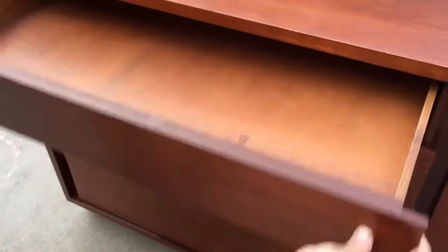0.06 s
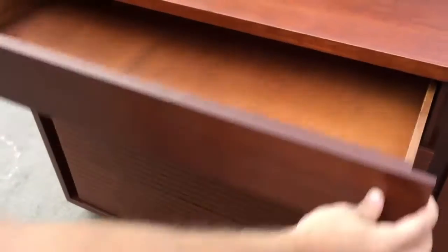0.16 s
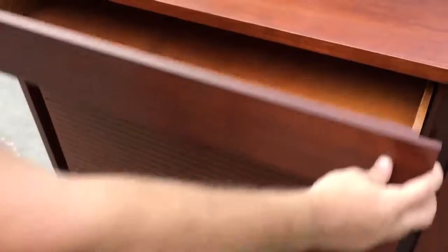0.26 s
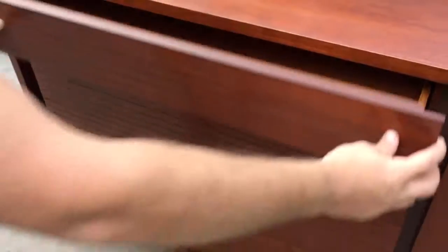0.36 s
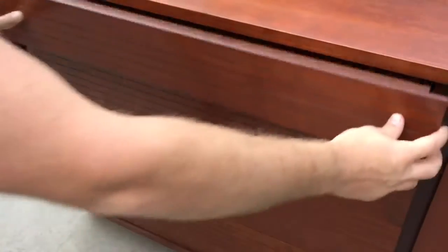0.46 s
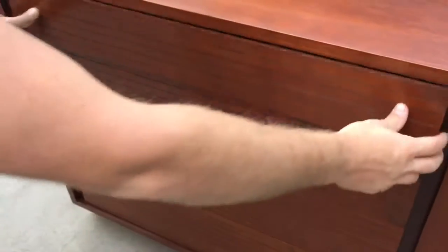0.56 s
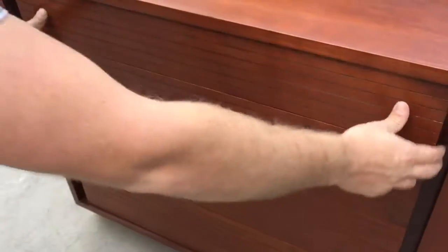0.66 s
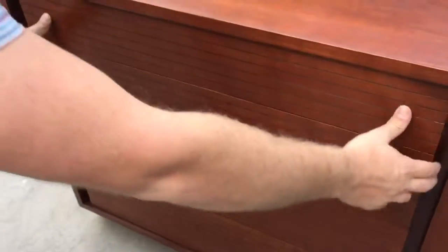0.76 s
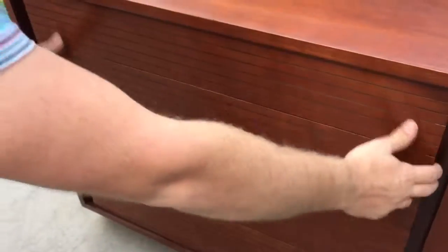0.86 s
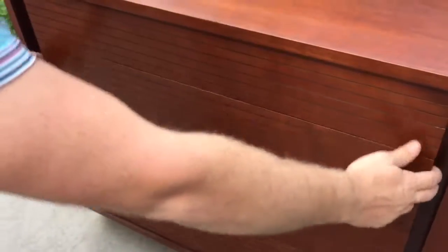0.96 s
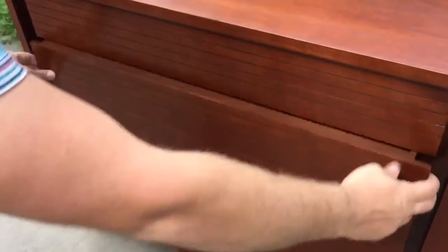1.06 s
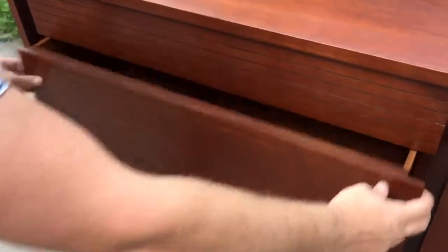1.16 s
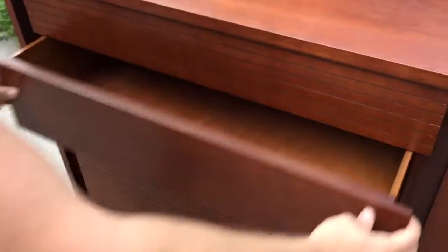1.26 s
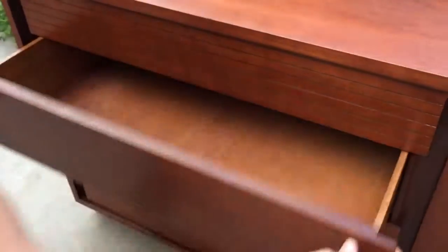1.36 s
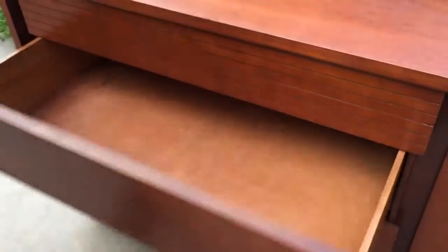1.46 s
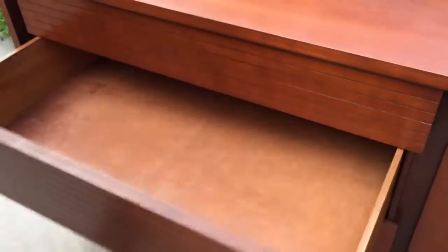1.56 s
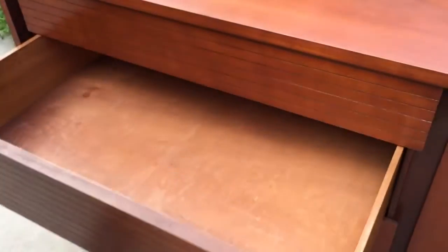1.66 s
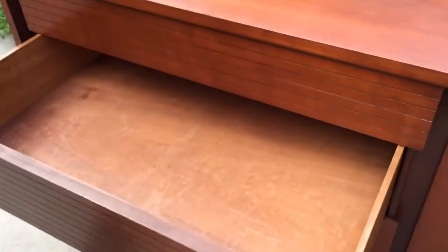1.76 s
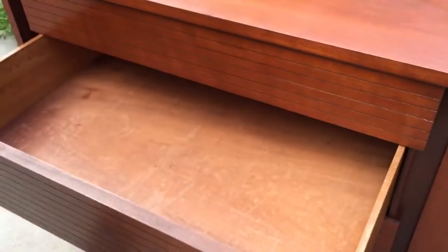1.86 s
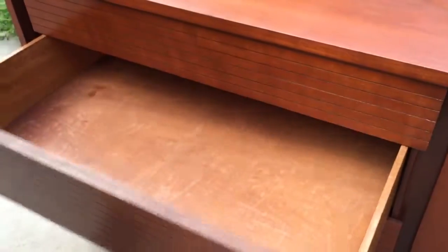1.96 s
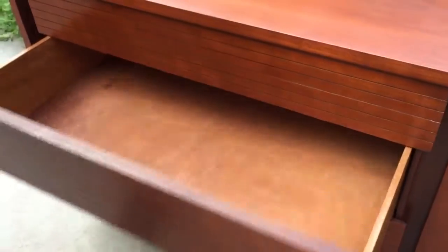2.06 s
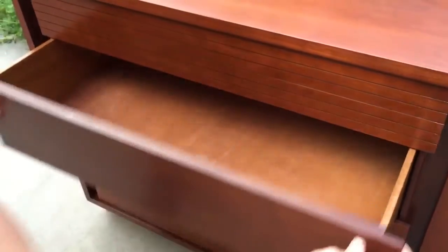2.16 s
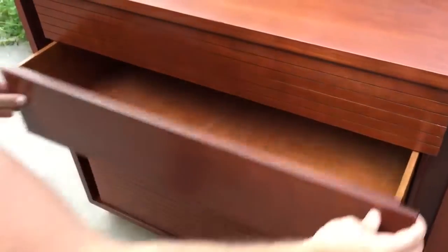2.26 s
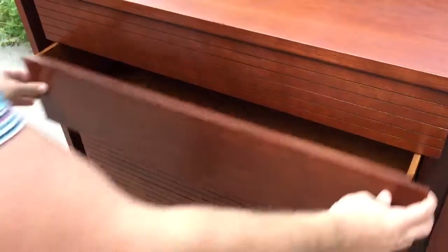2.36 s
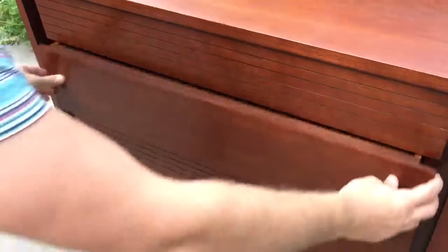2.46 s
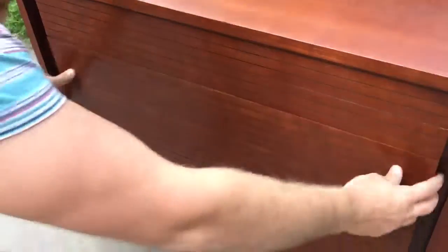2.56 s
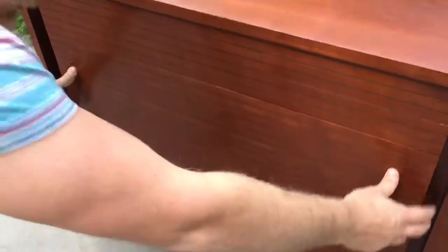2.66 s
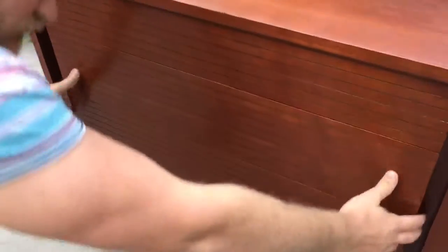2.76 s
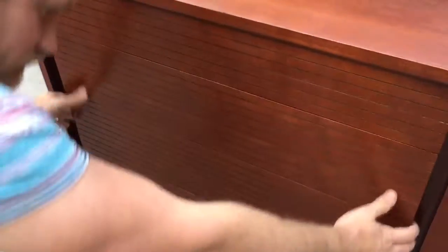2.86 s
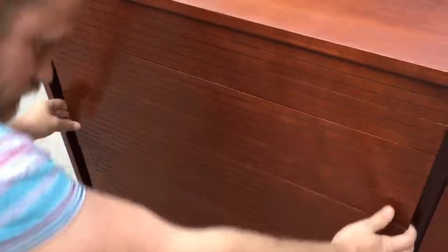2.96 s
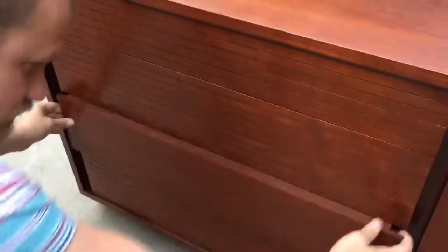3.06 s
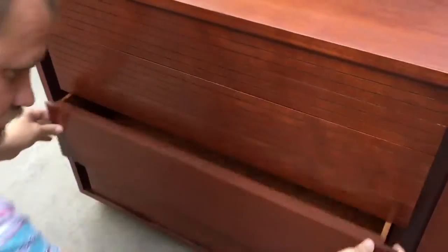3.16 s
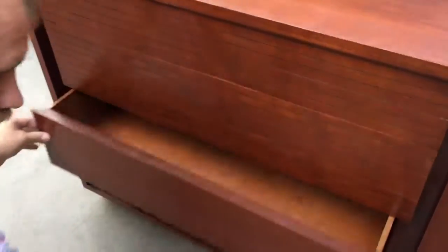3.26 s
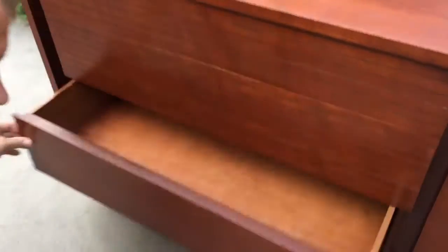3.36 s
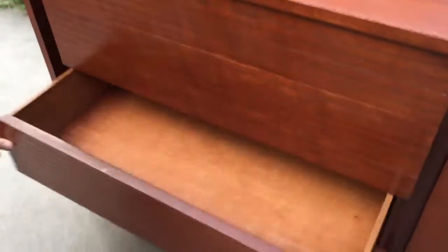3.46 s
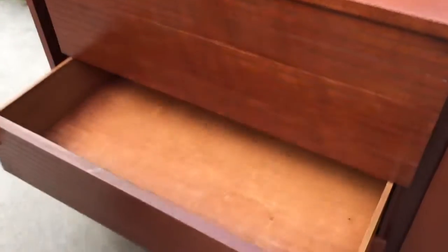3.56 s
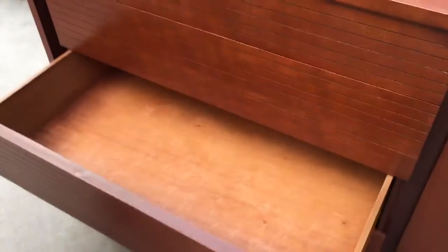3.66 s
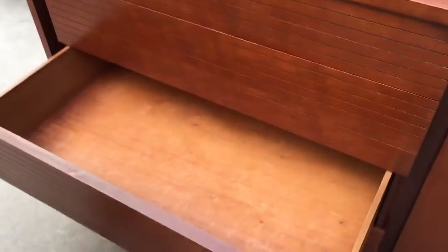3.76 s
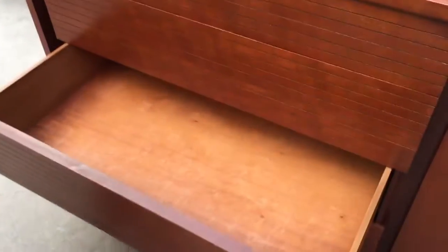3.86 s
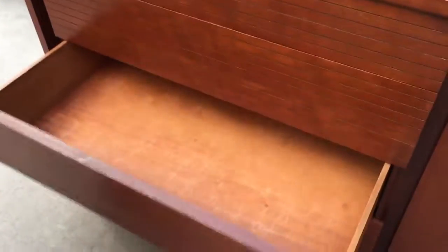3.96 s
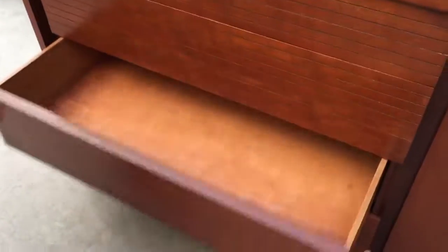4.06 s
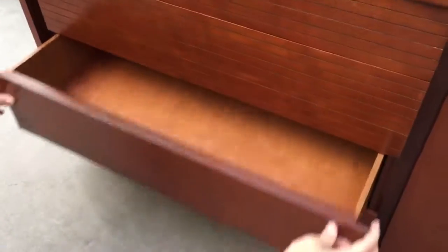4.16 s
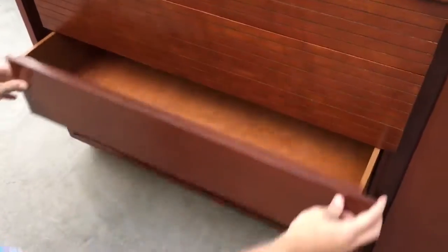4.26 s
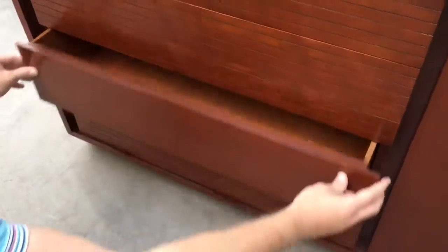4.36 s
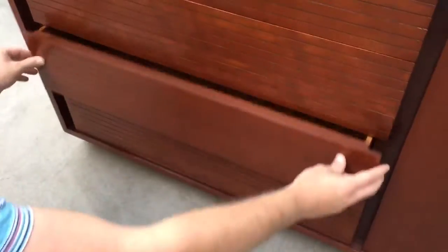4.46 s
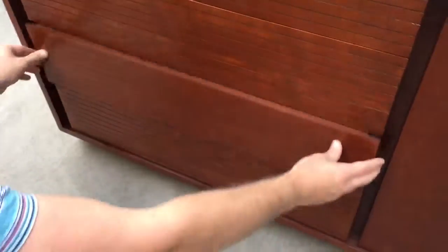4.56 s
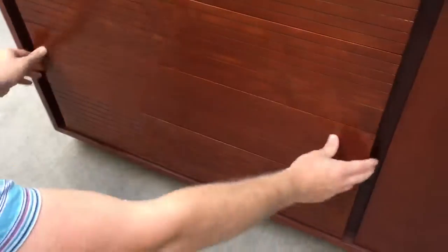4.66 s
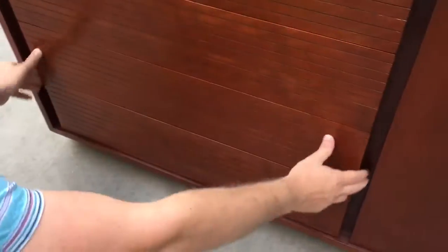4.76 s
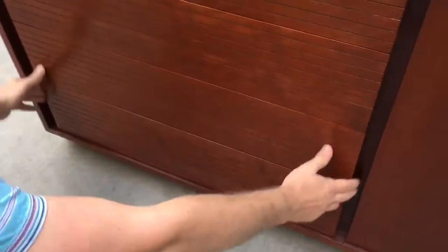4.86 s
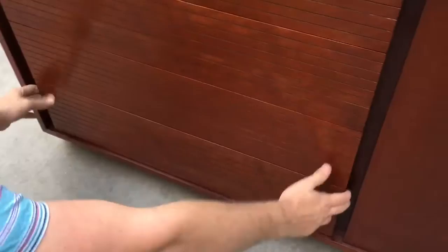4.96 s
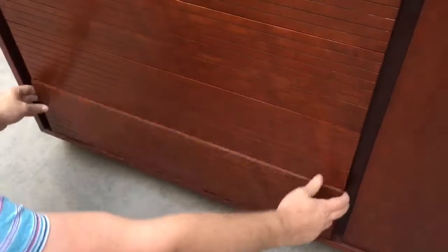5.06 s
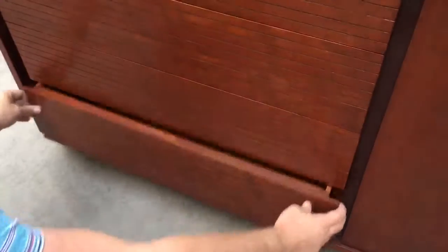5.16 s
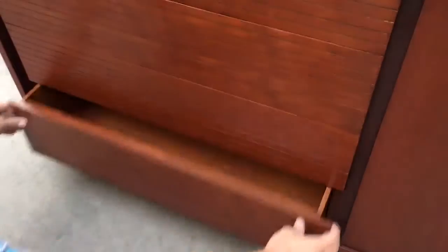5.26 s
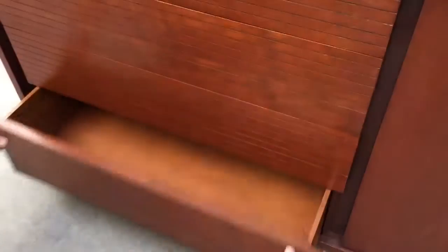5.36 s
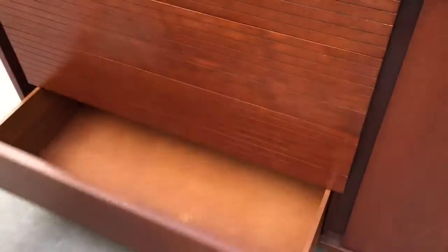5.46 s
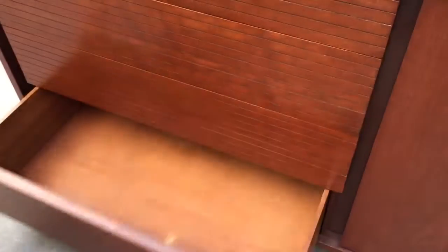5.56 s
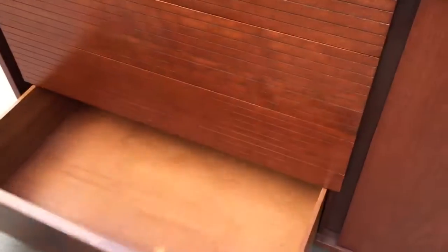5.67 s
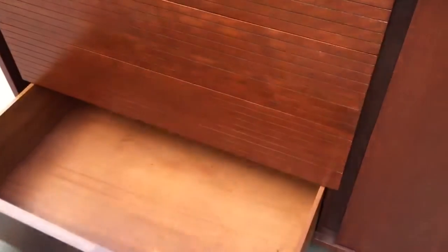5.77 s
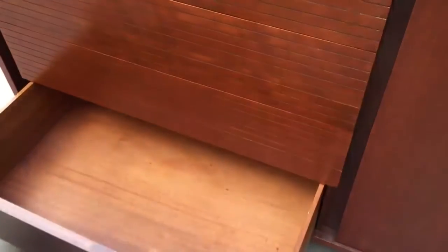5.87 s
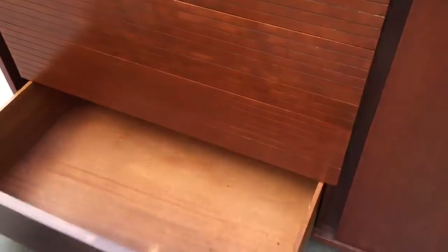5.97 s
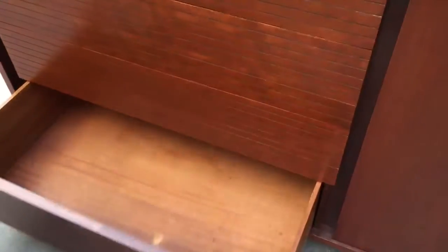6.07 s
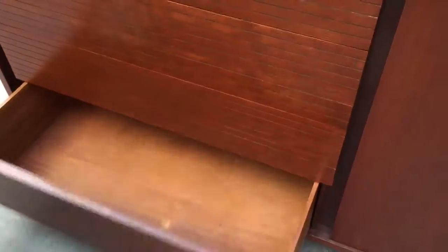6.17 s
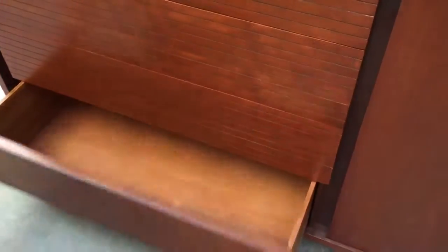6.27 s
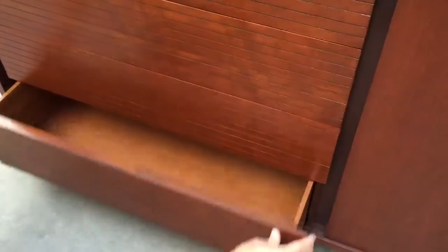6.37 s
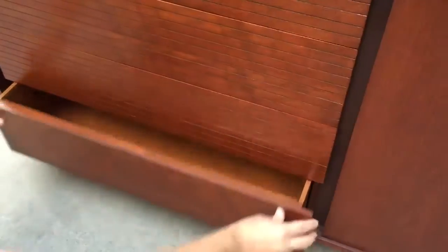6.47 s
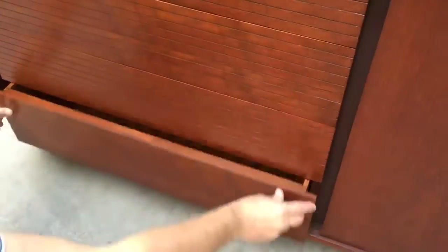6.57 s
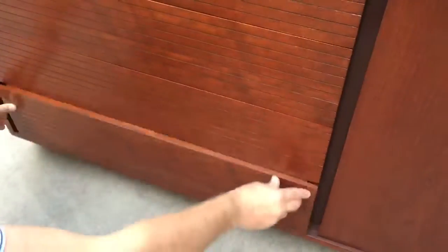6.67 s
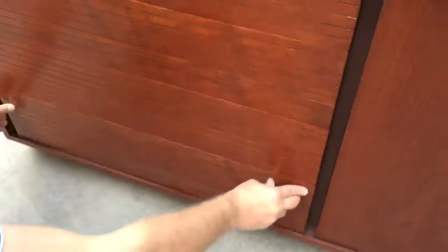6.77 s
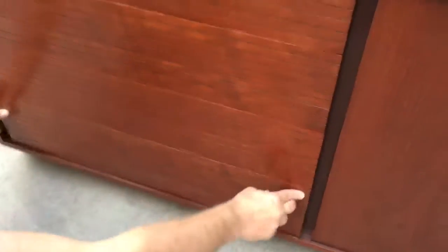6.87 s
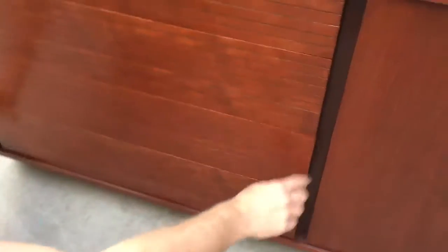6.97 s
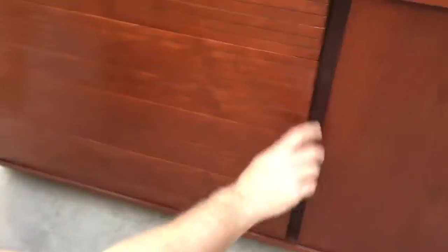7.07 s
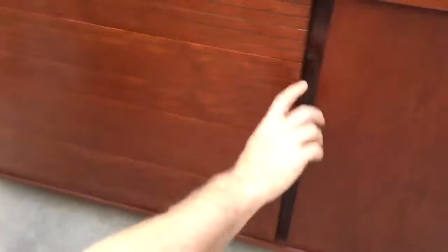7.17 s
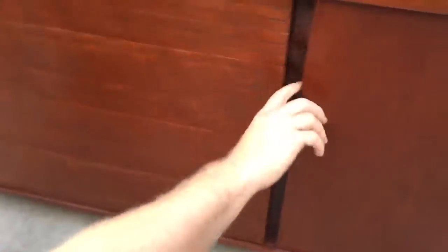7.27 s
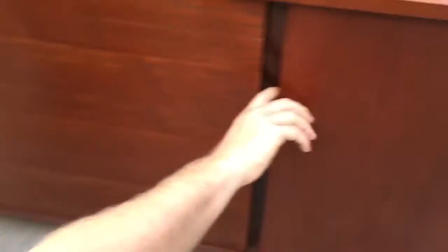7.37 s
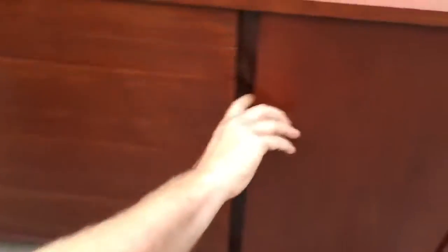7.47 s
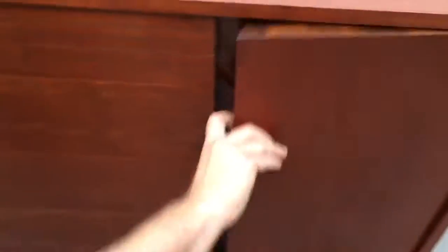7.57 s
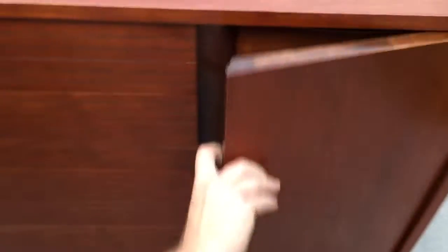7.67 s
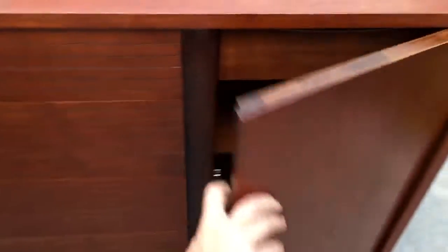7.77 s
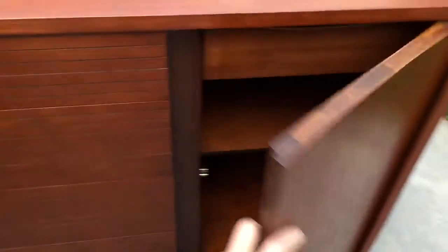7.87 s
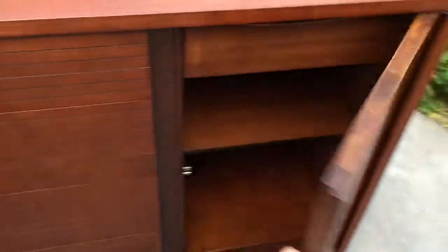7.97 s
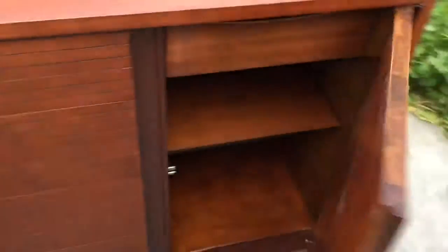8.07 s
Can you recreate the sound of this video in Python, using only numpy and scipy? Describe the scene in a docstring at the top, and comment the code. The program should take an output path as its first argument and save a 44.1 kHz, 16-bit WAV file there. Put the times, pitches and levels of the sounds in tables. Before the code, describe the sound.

Close and dry, four empty wooden drawers are worked one after another: grainy sliding swells and eases, small thuds catch on the runners, and each closing cracks sharply with a short boxy boom. Fingers brush and tap the wood between moves. A door then swings almost silently, humming deep, as low road noise slowly grows behind.

```python
"""Wood hisses and rumbles on runners over murmuring traffic, then a drawer shuts with a hollow knock.
Three more drawers of this outdoor sideboard are pulled out and pushed shut in turn; then its door hums open.
Friction is random slips, coloured by runner and panels or ringing the box modes, and follows the hand's speed.
Knocks, bumps and taps are bursts of decaying wood modes; traffic is coloured noise with band-passed drones."""
import sys
import numpy as np
from scipy import signal
from scipy.fft import rfft, irfft, next_fast_len
from scipy.io import wavfile

SR = 44100
rng = np.random.default_rng(int(sys.argv[2]) if len(sys.argv) > 2 else 0)


def transcribe(signal):
    """Save signal, clipped to [-1, 1], as a 16-bit WAV file at the path in sys.argv[1]."""
    frames = np.atleast_2d(signal).T
    limited = np.clip(frames, -1, 1)
    pcm = np.round(limited * 32767).astype(np.int16)
    wavfile.write(sys.argv[1], SR, pcm)


N = 358091
TIME = np.arange(N) / SR
RING = TIME[:SR // 2]  # time axis of one ringing sound


def from_db(db):
    """Decibels to gain."""
    return 10 ** (np.asarray(db) / 20)


def rms_one(x):
    """Scale to unit rms."""
    return x / np.sqrt(np.mean(x ** 2) + 1e-20)


def at_hz(points, hz):
    """Read a table on a log-frequency axis."""
    point_hz, value = np.transpose(points)
    return np.interp(np.log(hz + 1), np.log(point_hz), value)


def colour(x, spectrum):
    """Give a steady sound a spectrum; rms 1."""
    size = next_fast_len(N)
    gain = from_db(at_hz(spectrum, np.fft.rfftfreq(size, 1 / SR)))
    return rms_one(irfft(rfft(x, size) * gain, size)[:N])


def drift(rate_hz):
    """Random values joined by straight lines, rate_hz of them a second; spread about 1."""
    return np.interp(TIME * rate_hz, np.arange(4000), rng.standard_normal(4000))


def add(track, s, sound):
    """Mix a sound into the track at a time."""
    at = round(s * SR)
    track[at:at + len(sound)] += sound[:N - at]


def ring(modes):
    """Free ringing of struck modes: decaying sines."""
    out = np.zeros(len(RING))
    for pitch_hz, level_db, t60_s in modes:
        out += from_db(level_db - 60 * RING / t60_s) * np.sin(2 * np.pi * pitch_hz * RING)
    return out


# decay of the weaker panel modes: pitch_hz [Hz], t60_s [s]
WOOD_T60 = [(150, 0.26), (500, 0.24), (1200, 0.14), (2500, 0.12), (5000, 0.13), (12000, 0.08)]


def crowd(spectrum, tilt_db_per_oct=0, edge_hz=20000, uneven_db=2.5):
    """Many overlapping modes of uneven strength, each octave dying at its own rate; starts at rms 1."""
    hz = np.fft.rfftfreq(len(RING), 1 / SR)
    tilt_db = tilt_db_per_oct * np.log2(hz / 1000 + 1 / 10)
    level_db = at_hz(spectrum, hz) + tilt_db + uneven_db * peaks_db(hz, 35)
    phases = np.exp(2j * np.pi * rng.random(len(hz)))
    modes = from_db(level_db) / np.sqrt(1 + (hz / edge_hz) ** 8) * phases * (hz > 40)
    modes /= np.std(irfft(modes))
    octave = np.round(np.log2(hz + 1))
    out = np.zeros(len(RING))
    for k in range(5, 15):
        decay = from_db(-60 * RING / at_hz(WOOD_T60, 2. ** k))
        out += irfft(modes * (octave == k)) * decay
    return out


def soften(x, contact_s):
    """The force of a contact takes a moment to build."""
    return x * (1 - np.exp(-RING / contact_s))


def friction(per_s, spread_db):
    """Wood fibres catch and let go: random slips of uneven size."""
    size_db = spread_db * np.minimum(rng.exponential(1, N), 4)
    slips = from_db(size_db) * rng.choice([-1, 1], N)
    return slips * (rng.random(N) < per_s / SR)


def peaks_db(hz, spacing_hz):
    """Capped peaks and deeper valleys of a wooden panel's response; spread about 1."""
    heights = np.minimum(rng.standard_normal(1500), 1)
    return np.interp(hz / spacing_hz, np.arange(len(heights)), heights)


def through_wood(x, tilt_db_per_oct, ripple_db=8.0, spacing_hz=75):
    """Friction is radiated by panels that favour some pitches over others."""
    hz = np.fft.rfftfreq(len(x), 1 / SR)
    tilt_db = tilt_db_per_oct * np.log2(hz / 6000 + 1 / 10)
    return irfft(rfft(x) * from_db(ripple_db * peaks_db(hz, spacing_hz) + tilt_db), len(x))


def speed(start_s, rise_s, fall_s):
    """A hand's movement gathers speed, then eases to a stop; 0 to 1."""
    corners_s = [start_s, start_s + rise_s, start_s + rise_s + fall_s]
    return np.maximum(np.sin(np.pi * np.interp(TIME, corners_s, [0, .5, 1])), 0)


def touch(start_s, length_s):
    """Pressure of a brief rubbing contact; 0 to 1."""
    return np.sqrt(speed(start_s, length_s / 2, length_s / 2))


# spectrum of the air and microphone hiss: pitch_hz [Hz], density_db [dB per Hz]
AIR_SPECTRUM = [(1000, 8.5), (4000, 3.5), (9000, -5.5), (10500, -8.5), (12000, -5.5), (15500, -10.5)]


def air(level_db=-73):
    """Steady faint hiss of the air and the microphone: coloured noise."""
    return from_db(level_db) * colour(rng.standard_normal(N), AIR_SPECTRUM)


# tyre noise level: time_s [s], level_db [dB]
TYRE_LEVELS = [(0, -56), (1.1, -55), (1.95, -57.5), (2.6, -55.5), (4.7, -55), (8.1, -49.5)]
# tyre noise spectrum: pitch_hz [Hz], density_db [dB per Hz]
TYRE_SPECTRUM = [(25, -29), (42, -15.5), (62, 15), (80, -1.5), (115, 8.5), (150, -3), (200, -4), (300, -15),
                 (400, -11.5), (650, -4.5), (1000, -3.5), (1700, -11), (3000, -26.5), (5000, -41),
                 (9000, -41), (15000, -59)]
# engine levels: time_s [s], low_drone_db [dB], upper_drone_db [dB]
ENGINE_LEVELS = [(0, -58, -89), (1, -58.5, -66), (2, -63.5, -75), (3.1, -65, -70), (4.6, -52.5, -68.5),
                 (5.15, -57, -70.5), (6, -76.5, -63), (7.1, -60, -60.5), (8.1, -59, -59)]
# engine drone bands: pitch_hz [Hz], width_hz [Hz]
DRONE_BANDS = [(107, 16), (265, 72)]


def traffic():
    """Far tyres slowly swell as coloured noise; engines drone beneath as narrow bands of noise."""
    out = from_db(np.interp(TIME, *np.transpose(TYRE_LEVELS))) * colour(rng.standard_normal(N), TYRE_SPECTRUM)
    time_s, *drone_levels_db = np.transpose(ENGINE_LEVELS)
    for level_db, (pitch_hz, width_hz) in zip(drone_levels_db, DRONE_BANDS):
        edges_hz = [pitch_hz - width_hz / 2, pitch_hz + width_hz / 2]
        band = signal.butter(2, edges_hz, "band", fs=SR, output="sos")
        # the first second lets the filter settle
        drone = rms_one(signal.sosfilt(band, rng.standard_normal(N + SR))[SR:])
        out += from_db(np.interp(TIME, time_s, level_db)) * drone
    return out


# swing of the door: start_s [s], rise_s [s], fall_s [s]
DOOR_SWING = (7.59, .29, .34)


def door(pitch_hz=64, full_speed_db=-42.5, speed_power=1.1):
    """Hinge friction keeps the door's lowest mode swinging, the more so the faster it turns."""
    phase = 2 * np.pi * np.cumsum(pitch_hz * (1 + 0.0055 * drift(5.8))) / SR
    return from_db(full_speed_db) * speed(*DOOR_SWING) ** speed_power * np.sqrt(2) * np.sin(phase)


# fingers or a drawer's edge brush the wood: start_s [s], end_s [s], level_db [dB, before the panels]
BRUSHES = [(0.857, 1.033, -74.5), (2.839, 2.998, -68), (4.165, 4.219, -61.5), (4.912, 5.058, -68.5),
           (5.7, 5.766, -64.5), (6.1, 6.236, -68.5), (7.25, 7.355, -81), (7.454, 7.66, -81),
           (8.06, 8.22, -64)]
# brushing spectrum: pitch_hz [Hz], density_db [dB per Hz]
BRUSH_SPECTRUM = [(2000, 2), (4000, 2.5), (6500, 1), (8700, 2.5), (10400, -4.5), (12000, -2),
                  (15500, -11.5)]


def brushing():
    """Light touches slide over the finish with a thin hiss that swells and fades."""
    pressure = sum(from_db(level_db) * touch(start_s, end_s - start_s) for start_s, end_s, level_db in BRUSHES)
    hiss = through_wood(colour(rng.standard_normal(N), BRUSH_SPECTRUM), 0)
    return pressure * hiss * from_db(1.6 * drift(90))


# a drawer tips or catches on its runners:
# time_s [s], level_db [dB], upper_edge_hz [Hz], tilt_db_per_oct [dB per octave]
BUMPS = [(1.208, -37, 260, -4.5), (2.031, -32, 850, -1.5), (2.169, -32.5, 298, -5), (2.186, -38, 129, -14),
         (2.209, -31.5, 636, 0), (2.318, -43, 405, 6), (3.94, -41.5, 490, -2.5), (4.051, -37.5, 320, -6),
         (4.158, -35.5, 416, -3), (4.273, -42, 433, 2), (4.306, -34.5, 110, -6), (5.296, -39, 215, 0),
         (5.633, -49.5, 250, 11), (5.711, -46.5, 880, 8), (6.106, -38, 428, 5.5), (6.201, -36.5, 520, 4.5),
         (6.221, -39, 298, 7), (6.292, -40, 496, 1), (6.754, -41, 213, 2)]
# bump spectrum: pitch_hz [Hz], density_db [dB per Hz]
BUMP_SPECTRUM = [(50, -12), (90, 10), (170, 2.5), (300, 6.5), (420, -5.5), (560, -1.5), (900, -6.5),
                 (2000, 9)]


def bumps(contact_s=0.0033):
    """A drawer bumps on its runners: dull modes under a soft contact."""
    out = np.zeros(N)
    for time_s, level_db, upper_edge_hz, tilt_db_per_oct in BUMPS:
        thud = crowd(BUMP_SPECTRUM, tilt_db_per_oct, upper_edge_hz)
        add(out, time_s, from_db(level_db) * soften(thud, contact_s))
    return out


# fingers tap the wood: time_s [s], level_db [dB], tilt_db_per_oct [dB per octave]
TAPS = [(1.053, -45, -5), (2.851, -59, 22), (3.945, -47.5, -0.5), (5.71, -54.5, -8.5), (7.049, -61.5, 7),
        (7.203, -65, 9), (7.265, -53, -6), (7.571, -61, -4), (7.605, -61.5, 5)]
# modes of a drawer front under a finger: pitch_hz [Hz], level_db [dB], t60_s [s]
FRONT_MODES = [(717, -10, 0.066), (887, -6, 0.31), (1260, -6, .08), (1810, -13, 0.11)]
# the crowd of weaker panel modes, also in slams(): pitch_hz [Hz], density_db [dB per Hz]
WOOD_SPECTRUM = [(100, -11), (250, -4), (400, -6), (800, -3), (1300, -5.5), (1900, 1), (2500, -8),
                 (3100, -6), (3800, -12), (5000, -16.5), (8000, -24.5), (9300, -24.5), (10500, -37),
                 (12000, -35), (15000, -44)]


def taps(damping_s=0.027, front_at_zero_tilt_db=-6, contact_s=0.00054):
    """Light taps that the fingers damp at once; the duller ones ring the drawer front more."""
    out = np.zeros(N)
    for time_s, level_db, tilt_db_per_oct in TAPS:
        tick = crowd(WOOD_SPECTRUM, tilt_db_per_oct) * np.exp(-RING / damping_s)
        front = from_db(front_at_zero_tilt_db - tilt_db_per_oct) * ring(FRONT_MODES)
        add(out, time_s, from_db(level_db) * soften(tick + front, contact_s))
    return out


# a drawer binds: start_s [s], length_s [s], level_db [dB]
GROANS = [(0.39, 0.12, -53.5), (1.375, 0.11, -51.5), (1.514, .08, -50.5), (2.03, .05, -48),
          (2.14, .12, -48.5), (2.345, 0.058, -47.5), (2.407, 0.052, -50.5), (5.42, .12, -61),
          (6.2, .2, -59)]
# modes of a drawer's bottom: pitch_hz [Hz], level_db [dB], t60_s [s]
GROAN_MODES = [(274.4, 1, 0.096), (401, -8, .1), (528.3, 7.5, 0.068), (593, -10, 0.15), (685, -9, 0.055),
               (960, -12, 0.26)]


def groaning():
    """Where a drawer binds, coarse slips ring its bottom."""
    slips = friction(per_s=1600, spread_db=0.5)
    groan = rms_one(signal.fftconvolve(slips, ring(GROAN_MODES))[:N])
    return groan * sum(from_db(level_db) * touch(start_s, length_s) for start_s, length_s, level_db in GROANS)


# modes of each drawer box: pitch_hz [Hz], level_db [dB], t60_s [s]
TOP_BOX = [(57.8, -12.5, 0.4), (86, -28, 0.2), (129, -21, 0.41), (197.6, -4, 0.23), (215.7, -3, 0.14),
           (263, -10, 0.36), (334, -24, 0.082), (549, -1.5, 0.13), (592, -2.5, 0.062), (660, -10, 0.075),
           (863, -15, 0.14)]
SECOND_BOX = [(55.8, -29, 0.91), (98, -4.5, 0.32), (134, -4, 0.11), (157.2, 4.5, 0.25), (180, -11, 0.22),
              (224.6, -9.5, 0.29), (327, -12, 0.25), (355.5, -12, 0.147), (520, -36, 0.096),
              (830, -11, 0.12)]
THIRD_BOX = [(54.6, -10, 0.34), (110, -3, 0.21), (134.3, 15, 0.063), (161.8, 0.5, 0.23), (188.6, -13, 0.39),
             (225, -2, 0.23), (320, 3.5, 0.1), (376, -9, 0.16), (590, -24, 0.13), (805, -65, 0.043)]
BOTTOM_BOX = [(77.4, -16, 0.46), (106, -23, 0.21), (123, 3, 0.25), (158.7, 0, 0.26), (176, 3, 0.2),
              (273, -19, 0.16), (356, -1.5, 0.097), (449, -4.5, 0.075), (613, -5, 0.049),
              (844, -10.5, 0.14)]
BOXES = [TOP_BOX, SECOND_BOX, THIRD_BOX, BOTTOM_BOX]
# when the hand moves on to the next drawer: time_s [s]
NEXT_DRAWER_S = [1.0, 3.0, 5.1]


def box_at(s):
    """Modes of the drawer that is in hand at a time."""
    return BOXES[np.searchsorted(NEXT_DRAWER_S, s)]


# a hand pushes or pulls a drawer: start_s [s], rise_s [s], fall_s [s]; at full speed, before panels and load:
# hiss_db [dB], tilt_db_per_oct [dB per octave], fine_db [dB], rumble_db [dB], boom_db [dB], floor_db [dB]
STROKES = [(0.01, 0.17, 0.44, -58, 1.5, -69, -51.5, -63, -46),
           (1.09, 0.37, 0.37, -60.5, -1.5, -64, -55, -69, -53.5),
           (1.98, 0.21, 0.54, -59, 0, -66, -55, -68, -50), (3.13, 0.36, 0.39, -61, -2, -61, -53, -57, -66),
           (3.93, .33, 0.38, -61.5, -1, -66.5, -55.5, -57.5, -58),
           (5.18, 0.24, 0.57, -63.5, -4.5, -66, -47.5, -50.5, -50.5),
           (6.03, 0.37, 0.39, -62.5, -4.5, -64, -49.5, -49.5, -62)]
# spectra of hiss, fine hiss and rumble on the runners: pitch_hz [Hz], density_db [dB per Hz]
HISS_SPECTRUM = [(900, 8), (1500, 10.5), (2500, 6.5), (4000, 3.5), (6000, 2.5), (8000, -2), (9500, -7.5),
                 (11000, -17)]
FINE_SPECTRUM = [(7000, -9), (9000, 1), (10400, -7), (11800, -4), (14000, -21), (16000, 2.5)]
RUMBLE_SPECTRUM = [(40, -48), (72, 16.5), (100, -1.5), (130, 4), (180, 5), (260, -2), (360, -16.5),
                   (480, -60), (900, -47)]
HISS_POWER, SHAKE_POWER = 1.7, 1  # hiss and shaking grow as these powers of speed
SHAKE_LAG_S = 0.058  # the heavy box takes a moment to start shaking
FLOOR_HZ = 77.2  # lowest mode of a drawer's thin floor


def sliding(uneven_hiss_db=0.04, uneven_shake_db=4.0):
    """Fine slips hiss on the runners; coarse ones shake the drawer and ring its box, all following its speed."""
    grain = from_db(2.26 * drift(49) + uneven_hiss_db * drift(16))
    slips = friction(per_s=16000, spread_db=2.5)
    hiss = colour(slips, HISS_SPECTRUM) * grain
    fine = colour(slips[::-1], FINE_SPECTRUM) * grain
    rumble = colour(friction(per_s=1000, spread_db=2.0), RUMBLE_SPECTRUM)
    jolts = friction(per_s=1100, spread_db=5.0)
    load = from_db(uneven_shake_db * drift(32))
    # steady dragging keeps the floor swinging at a wavering pitch
    floor_phase = 2 * np.pi * np.cumsum(FLOOR_HZ * (1 + 0.0728 * drift(53))) / SR
    floor = np.sqrt(2) * np.sin(floor_phase)
    out = np.zeros(N)
    for start_s, rise_s, fall_s, hiss_db, tilt_db_per_oct, fine_db, rumble_db, boom_db, floor_db in STROKES:
        on = (TIME > start_s) & (TIME < start_s + rise_s + fall_s + SHAKE_LAG_S)
        pace = speed(start_s, rise_s, fall_s)[on]
        sway = speed(start_s + SHAKE_LAG_S, rise_s, fall_s)[on]
        rub = pace ** HISS_POWER * (from_db(hiss_db) * hiss[on] + from_db(fine_db) * fine[on])
        # the favoured pitches crossfade over the stroke as the contact travels along the runner
        travel = np.linspace(0, 1, on.sum())
        scrape = np.zeros(on.sum())
        for place in np.linspace(0, 1, 10):
            nearness = np.clip(1 - 9 * np.abs(travel - place), 0, 1)
            scrape += nearness * through_wood(rub, tilt_db_per_oct)
        boom = rms_one(signal.fftconvolve(jolts[on], ring(box_at(start_s)))[:on.sum()])
        shake = from_db(rumble_db) * rumble[on] + from_db(boom_db) * boom
        shake += from_db(floor_db) * floor[on] * sway  # the floor grows by one more power of speed
        out[on] += scrape + sway ** SHAKE_POWER * load[on] * shake
    return out


# shutting: a corner touches, the front seats, then it rebounds:
# time_s [s], crack_db [dB], tilt_db_per_oct [dB per octave], boom_db [dB]
SLAMS = [(0.7218, -37, -3.5, -43), (0.7264, -27.5, -8.5, -22.5), (0.7353, -39, -8, -38),
         (0.7399, -51.5, 0.5, -29.5), (2.686, -31, -1.5, -33.5), (2.6913, -33, -3.5, -18),
         (2.6935, -26.5, 0.5, -29), (2.708, -27, -5, -28), (4.763, -46, -5, -63),
         (4.7648, -29.5, -6.5, -48), (4.7691, -44, -14, -29.5), (4.7951, -40, -14, -34.5),
         (6.8692, -49, 6, -32), (6.8754, -25.5, -9, -24), (6.887, -47, 0, -50), (6.8964, -52, -3, -47)]
# high modes of the cabinet's panels: pitch_hz [Hz], level_db [dB], t60_s [s]
PANEL_MODES = [(1126, 22, 0.077), (1463, -35, 0.043), (1680, -16, .13), (1676, 8.5, 0.21), (1780, -7, 0.1),
               (1910, -6, 0.29), (2120, -4, 0.1), (2309, 5.5, 0.18), (2570, -21, 0.082), (2650, -14, .11),
               (3040, -16, 0.12), (3380, 0, 0.11), (3500, -30, 0.076), (3840, 3.5, 0.1)]


def slams(panel_db=-8, box_contact_s=0.0018, crack_contact_s=0.0005, clack_db=4, clack_s=0.0035):
    """Each contact of a shutting drawer cracks through the panels and sets its box booming."""
    out = np.zeros(N)
    panel_rings = np.array([ring([mode]) for mode in PANEL_MODES]) / np.sqrt(len(PANEL_MODES))
    # the struck spot clacks first, before the energy spreads through the cabinet
    clack = from_db(-2.5 + clack_db * np.exp(-RING / clack_s))
    for time_s, crack_db, tilt_db_per_oct, boom_db in SLAMS:
        # every contact point drives the panel modes in senses of its own
        panels = rng.choice([-1, 1], len(PANEL_MODES)) @ panel_rings
        # dull contacts drive them less
        panels = from_db(panel_db + 2 * min(tilt_db_per_oct, 0)) * panels
        crack = soften(crowd(WOOD_SPECTRUM, tilt_db_per_oct) + panels, crack_contact_s) * clack
        boom = soften(ring(box_at(time_s)), box_contact_s)
        add(out, time_s, from_db(crack_db) * crack + from_db(boom_db) * boom)
    return out


def scene():
    """The sideboard in the open air: background, door, touches and drawers summed."""
    background = air() + traffic()
    touches = brushing() + bumps() + taps()
    drawers = groaning() + sliding() + slams()
    return (background + door() + touches + drawers)[None]


def record(dry):
    """The microphone loses the deepest bass; the top is cut."""
    thin = signal.sosfilt(signal.butter(4, 44, "high", fs=SR, output="sos"), dry)
    return signal.sosfilt(signal.ellip(12, .1, 70, 15650, fs=SR, output="sos"), thin)


dry = scene()
out = record(dry)
transcribe(out)
```